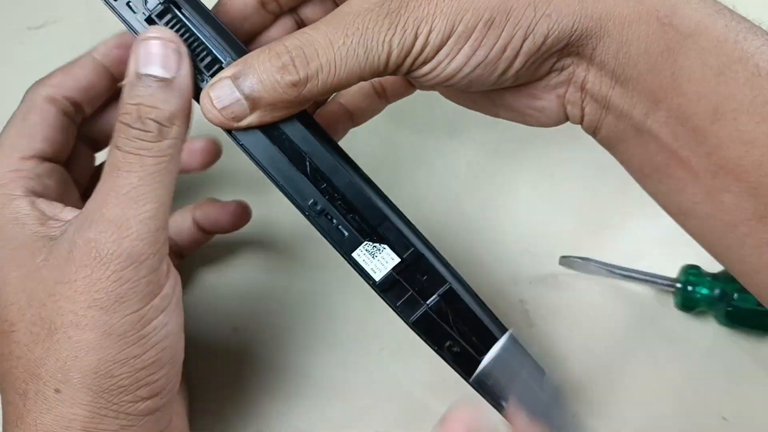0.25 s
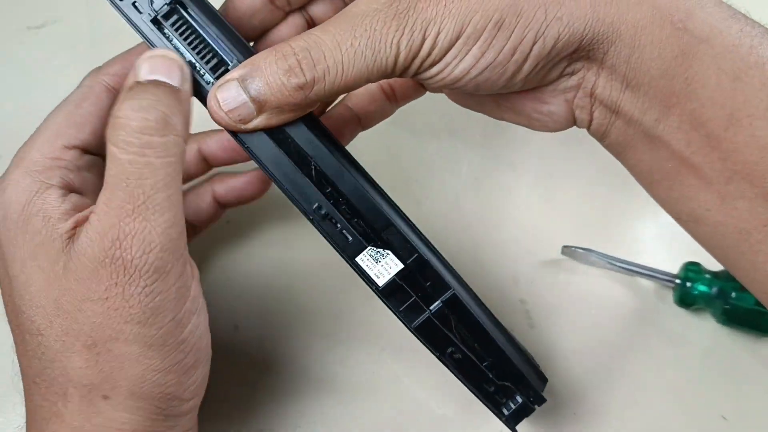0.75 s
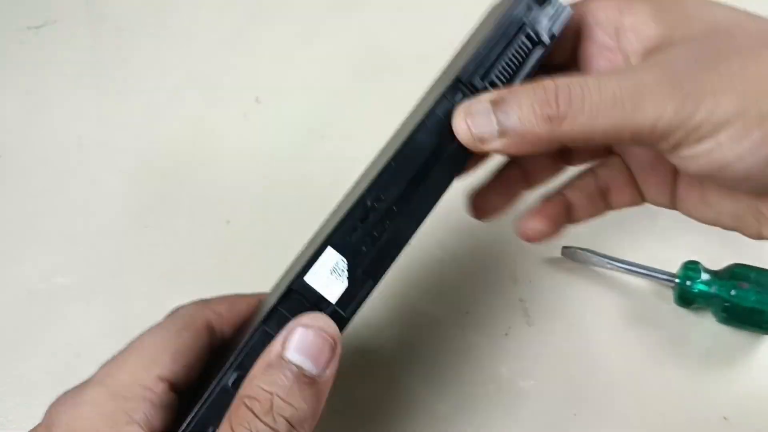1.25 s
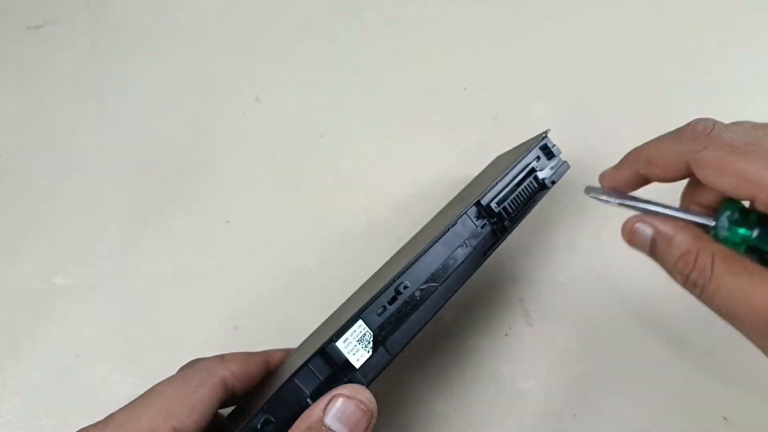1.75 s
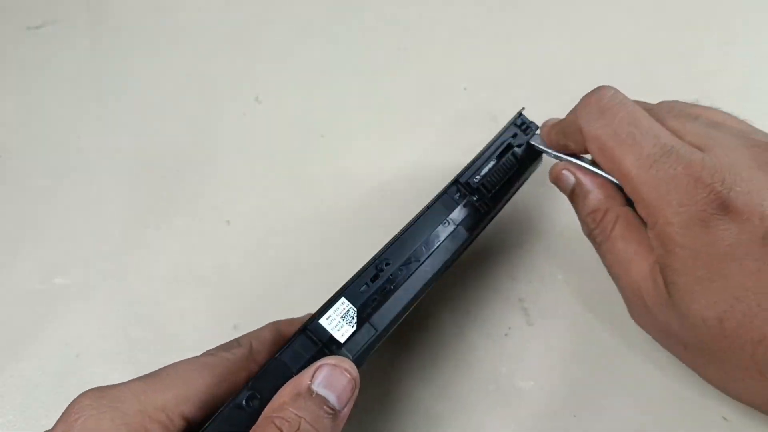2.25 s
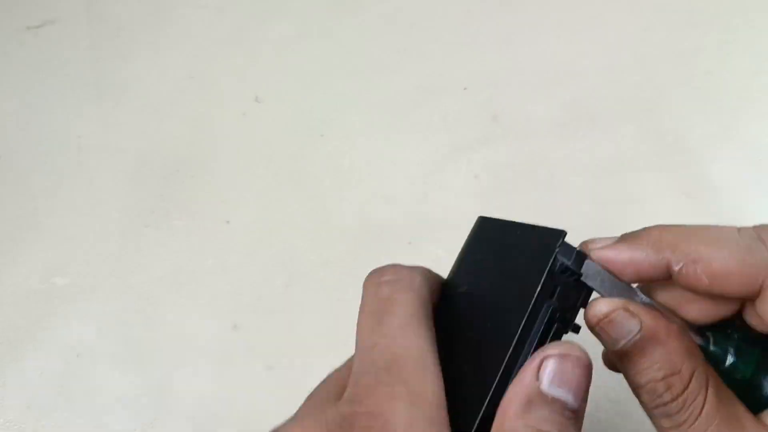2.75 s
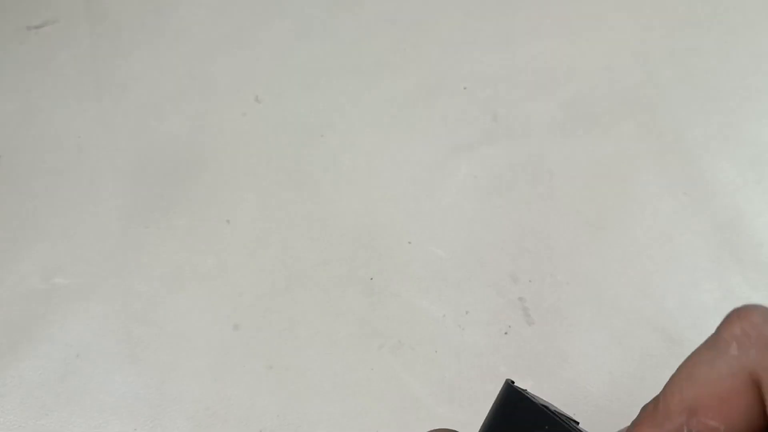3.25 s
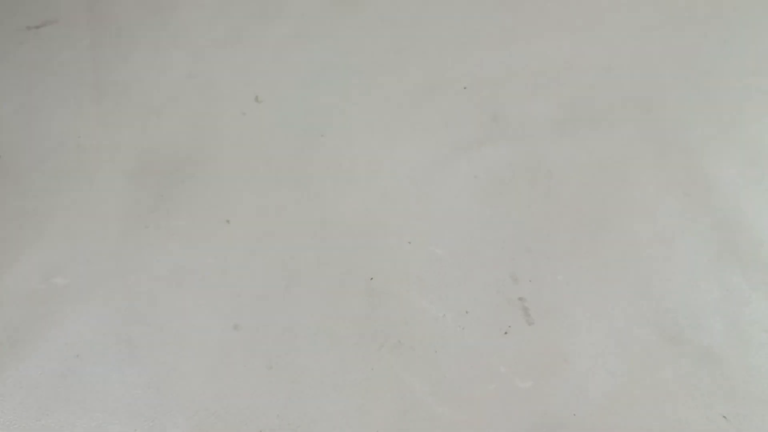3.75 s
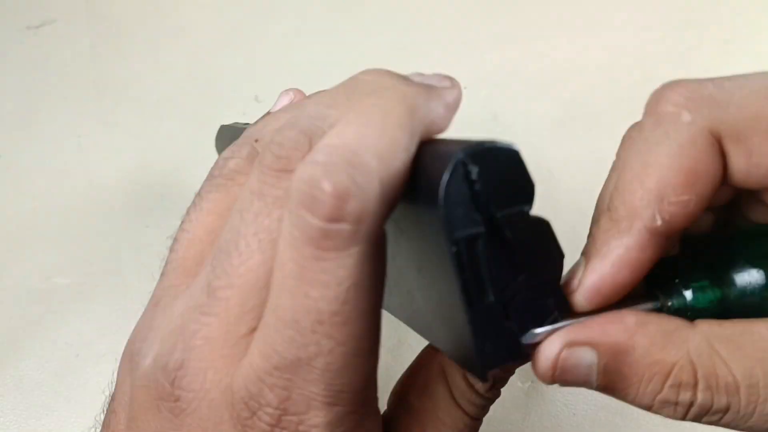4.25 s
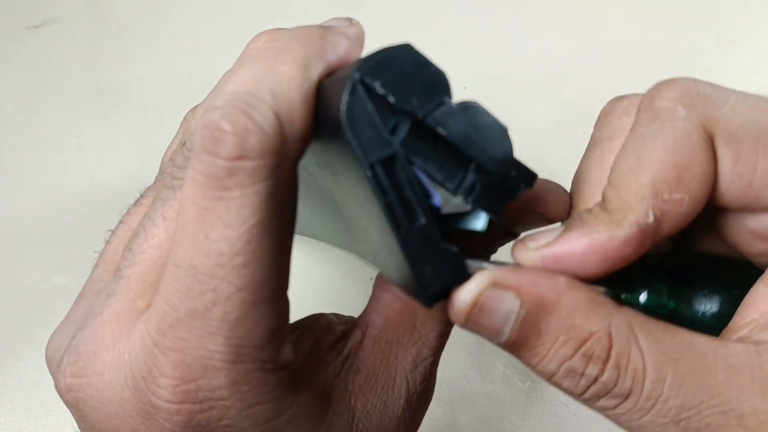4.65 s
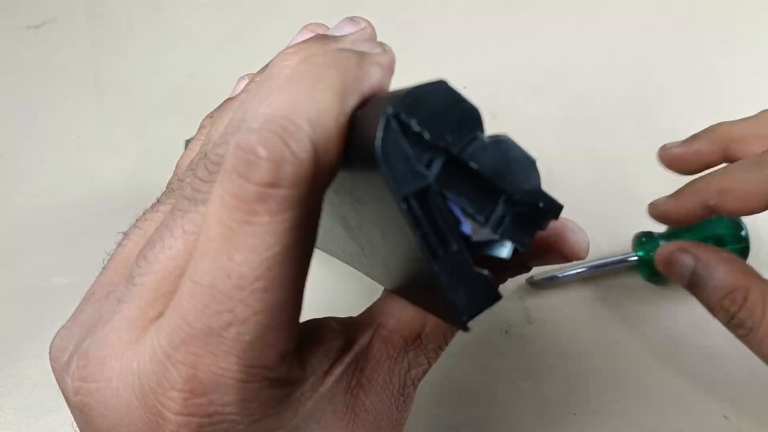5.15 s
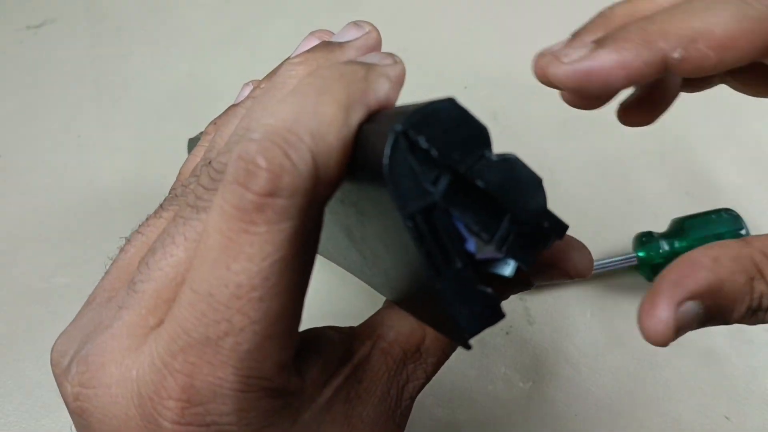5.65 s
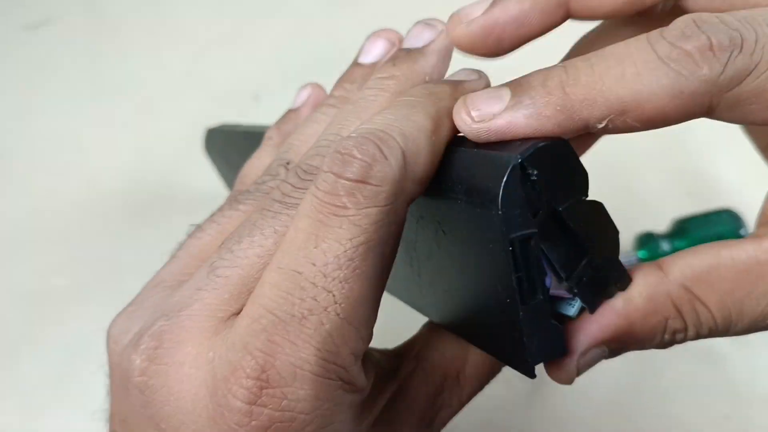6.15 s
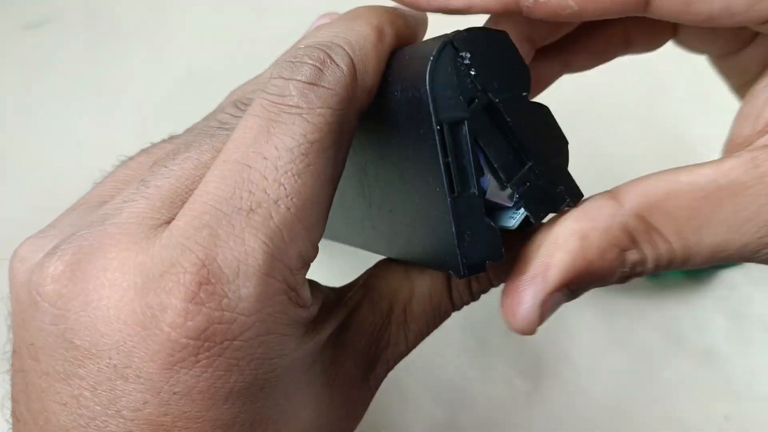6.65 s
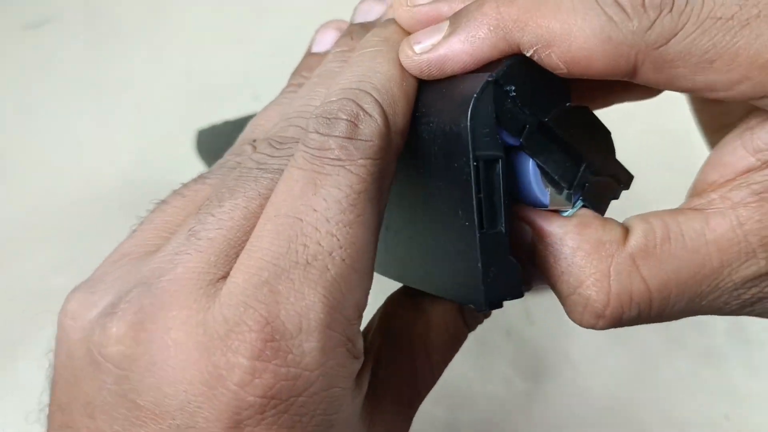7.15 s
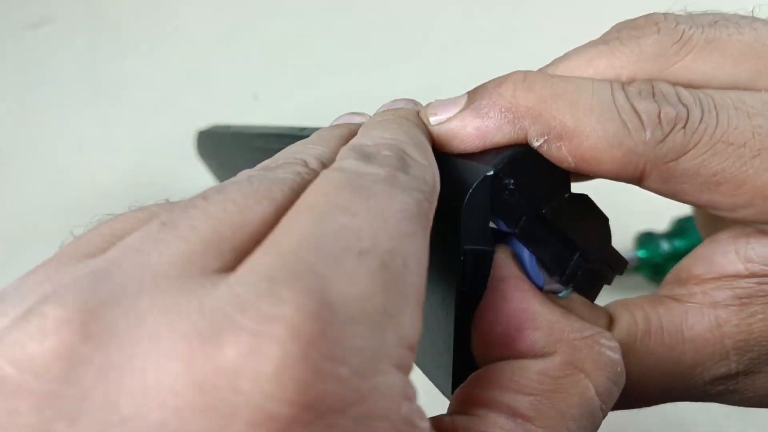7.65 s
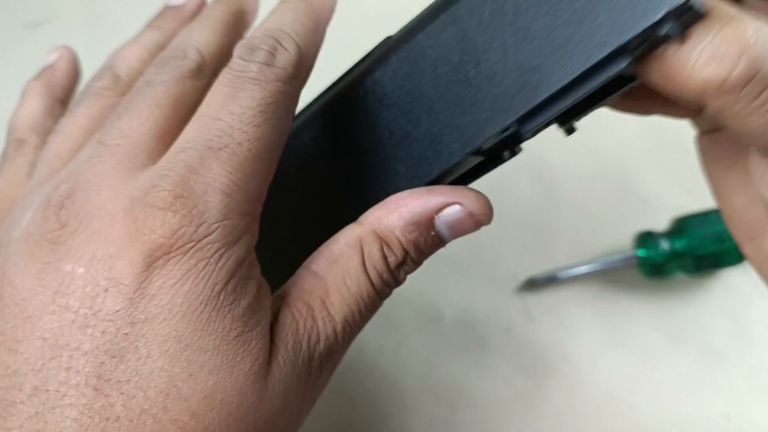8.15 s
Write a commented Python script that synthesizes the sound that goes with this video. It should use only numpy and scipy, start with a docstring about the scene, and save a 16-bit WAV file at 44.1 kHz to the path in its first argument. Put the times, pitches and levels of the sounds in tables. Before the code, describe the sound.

A hollow plastic case is pried open close up: a bump, metal clicks along a seam, then sharp snaps and crunchy cracks over soft rubbing.

```python
"""Soft bumps on a table, then metal clicks, over skin rubbing on plastic and a faint room murmur.
A hollow plastic battery case is pried open by hand, close to the microphone, in a small room.
A blade clicks and skids along the seam as filtered pulses and stick-slip runs; squeaks are damped sines.
The shell scuffs, knocks, then snaps and grinds as its clips let go, exciting shell modes and a short room tail.
The laid-down screwdriver rocks as damped modes; rub, hiss and murmur are coloured noise."""
import sys
import numpy as np
from scipy import signal
from scipy.fft import rfft, irfft, next_fast_len
from scipy.io import wavfile
from scipy.ndimage import map_coordinates

SR = 44100
rng = np.random.default_rng(int(sys.argv[2]) if len(sys.argv) > 2 else 0)


def dump_mix(stems):
    """Bounce the given channels to the path in sys.argv[1] as a 16-bit WAV at rate SR."""
    frames = np.atleast_2d(stems).T  # one column per channel
    limited = np.clip(frames, -1, 1)  # hard clip at full scale
    pcm = np.round(limited * 32767).astype(np.int16)
    wavfile.write(sys.argv[1], SR, pcm)


N = 370881  # samples in the scene

# low murmur of the room, before trim: (time [s], level [dB])
MURMUR_LEVEL = [(0.0, -55), (0.75, -58.5), (1.57, -56.5), (6.14, -59), (6.37, -56.5), (8.41, -57)]
# murmur spectrum: (frequency [Hz], density [dB per Hz])
MURMUR_SPECTRUM = [(15, -41.5), (25, 1.5), (49, -38.5), (94, -3.5), (185, 2.5), (256, -0.5), (427, -10.5),
                   (575, -11), (840, -10), (1440, -34.5), (1700, -28.5), (2480, -36.5), (10100, -38.5),
                   (14800, -48), (16000, -33)]
# room decay: (frequency [Hz], t60 [s])
ROOM_DECAY = [(150, 0.29), (700, 0.17), (2500, 0.19), (7000, 0.15), (15000, 0.025)]
# hands on the plastic, before trims and sway: (time [s], hollow rub level [dB], skin hiss level [dB])
HAND_LEVELS = [(0.0, -55.5, -66.5), (0.89, -55.5, -66), (1.26, -51, -60.5), (1.85, -59, -72.5),
               (2.67, -51.5, -63), (2.97, -54.5, -65.5), (3.32, -51, -68), (3.93, -59.5, -67),
               (4.56, -56.5, -66), (4.8, -50, -64), (5.22, -68.5, -71), (6.21, -59.5, -71),
               (6.53, -56, -66), (6.84, -65, -69.5), (7.21, -58, -66), (7.35, -55, -68), (8.01, -61, -68.5),
               (8.41, -70, -70.5)]
# hollow rub spectrum: (frequency [Hz], level [dB])
RUB_SPECTRUM = [(150, -42), (350, -1), (600, 5.5), (950, 2), (1400, -27), (2500, -21.5), (5000, -57)]
# skin hiss spectrum: (frequency [Hz], density [dB per Hz])
SKIN_SPECTRUM = [(710, -14.5), (1200, 2.5), (3050, -8), (3870, -11.5), (5180, -11), (9720, -20.5),
                 (15200, -31), (16000, -47.5)]
# bumps on the table: (time [s], level [dB])
TABLE_BUMPS = [(.016, -47), (0.075, -47), (0.199, -40.5), (1.473, -22.5), (1.505, -29), (2.706, -29.5),
               (2.721, -28.5), (4.21, -25), (4.771, -36), (5.081, -44), (5.69, -45.5), (6.241, -39.5),
               (6.654, -41.5), (7.334, -37), (7.931, -39)]
# table modes: (frequency [Hz], mean level [dB], t60 [s])
TABLE_MODES = [(120, -12.5, 0.24), (174, 2, .14), (205, 2, 0.023), (257.3, -1.5, 0.15), (331, -19.5, 0.11)]
# metal tip clicking in the seam: (time [s], level [dB], bass [dB], presence [dB], treble [dB])
SEAM_CLICKS = [(.0944, -44.5, 4, 6, 7), (0.1677, -36, -14, -5, -6), (0.1983, -30.5, -18, -8, -15),
               (2.11, -33.5, 10.5, -4, -8.5), (2.2252, -36, -7, -8, -6), (2.301, -32, -14, -3.5, -0.5),
               (2.3768, -39, 16.5, -4, 0), (2.3983, -38.5, -6, 0, -4), (2.916, -56, 15, 20, 25),
               (2.966, -47.5, 4, 17, 23), (3.1462, -30.5, 10.5, -3, -0.5), (3.2176, -44, 9, 7, 2),
               (3.262, -18.5, 10.5, 6, 1), (3.3402, -18, 0.5, 5, 1)]
# metal tip skidding along the seam: (peak time [s], fall [s], level [dB], brightness [dB])
SEAM_SKIDS = [(.195, 0.039, -39, -2), (1.85, 0.11, -61.5, -43), (2.225, 0.027, -40, -4.5),
              (2.4, 0.04, -42.5, -0.5), (2.566, 0.064, -43.5, 3.5), (2.663, 0.029, -46.5, 13),
              (2.706, 0.037, -29.5, -3.5), (2.841, .02, -47.5, 3), (2.988, 0.037, -48, -26),
              (3.05, 0.026, -48.5, 4.5), (3.144, .018, -49, 6), (3.261, 0.045, -32.5, 3),
              (3.341, .044, -36, -2), (3.484, 0.048, -49, 11), (3.587, 0.034, -43.5, -2),
              (3.729, 0.048, -53, 15), (4.52, .09, -62.5, 5)]
# base colour of a blade contact: (frequency [Hz], level [dB])
BLADE_SPECTRUM = [(50, -52), (120, -20), (300, -13.5), (520, -5), (640, -4.5), (830, 3.5), (1250, -2),
                  (1700, -4), (2200, -12.5), (3800, -15.5), (6000, -19), (10000, -25.5), (15500, -45)]
# steel squeaking or ringing as it slips: (time [s], frequency [Hz], level [dB], t60 [s])
STEEL_PINGS = [(.198, 5782, -69, .45), (.255, 3402, -63, .35), (2.701, 1130, -24, .09),
               (3.144, 5340, -46, .04), (3.474, 5600, -48, .06)]
# shell scuffing in the grip: (peak time [s], fall [s], level [dB], brightness [dB])
SCUFFS = [(1.036, 0.054, -55, -9), (1.103, 0.018, -52, -1), (1.2, 0.046, -49, -27),
          (1.465, .026, -35, -1.5), (1.546, 0.04, -54, 9.5), (4.145, .044, -48.5, 1), (3.877, .012, -46, 7),
          (3.952, 0.011, -49, 5), (4.609, 0.019, -39, 2), (5.135, 0.032, -57.5, 13),
          (5.699, 0.031, -34.5, -10), (6.091, .04, -46, -18), (6.375, .02, -41, 1), (6.528, 0.04, -45, -9),
          (6.565, 0.03, -39, 0.5), (6.897, 0.046, -49, -0.5), (7.001, 0.059, -44, 5)]
# case knocked, or loose halves knocking together; the row at 5.031 s is the screwdriver laid down on the table:
# (time [s], level [dB], bass [dB], brightness [dB], resonance [Hz])
KNOCKS = [(1.4711, -22.5, -6.5, -8, 820), (3.661, -43, 9, -0.5, 724), (3.9145, -52, -18, -2, 1630),
          (3.985, -49.5, -10, -1, 900), (4.2071, -30, 1.5, -4.5, 360), (4.559, -47.5, -15, 0.5, 580),
          (4.86, -34, -7, -1.5, 720), (4.983, -50.5, 0, 8, 1650), (5.031, -28.5, 0.5, -17.5, 520),
          (5.076, -46, -12, 5, 603), (6.3789, -25, 1.5, -7.5, 835), (6.609, -32, 6, -7, 650),
          (6.5734, -38.5, -6, -1.5, 760), (6.6444, -49, 10, 8, 540), (7.468, -54.5, 23, 17, 800),
          (7.133, -42.5, 14, 8, 1120), (7.1745, -36, -10, -1.5, 554), (7.3735, -38.5, -1, -12, 378),
          (7.498, -36.5, -2.5, -6, 390), (7.65, -36.5, -8, -6, 796), (8.1745, -41.5, -5, 2, 1660),
          (8.2444, -44.5, -5, -5.5, 725), (8.3602, -45.5, -2, -5, 1020)]
# a clip creeps, snaps free and grinds on: (time [s], snap level [dB], grind level [dB], rise [s], fall [s],
# bass [dB], presence [dB], treble [dB], resonance [Hz])
CLIP_SNAPS = [(4.6235, -31.5, -39.5, .012, 0.015, -5.5, 1.5, 1.5, 815),
              (4.7499, -22, -25, .015, 0.056, -5, 9, 11, 2310),
              (4.7688, -20, -24, 0.028, 0.052, -8, 5, 1.5, 2170),
              (4.927, -43, -38, 0.016, 0.016, -16, 3, -2, 1600),
              (6.241, -45.5, -51.5, .015, 0.065, 4, 1.5, 3, 760),
              (6.4055, -25.5, -31.5, 0.015, 0.041, 7, 6.5, 13, 870),
              (6.426, -29.5, -42, .008, 0.032, 9, 10, 3, 620),
              (6.692, -33, -38, .027, 0.056, 2.5, -2.5, -5, 606),
              (7.0264, -34, -26.5, .011, 0.05, 3, 5, 2.5, 850),
              (7.0451, -20, -34.5, .029, 0.077, -11, -0.5, -1, 840),
              (7.1887, -32.5, -43, 0.01, 0.012, -3, 3, 5, 396),
              (7.2833, -41, -45.5, .035, 0.046, 4.5, -1.5, -1.5, 1770),
              (7.5996, -38.5, -45, 0.013, 0.026, -6, -3, 4, 1870),
              (7.7205, -67, -44.5, .012, 0.035, -0.5, 4, -0.5, 730),
              (7.894, -24, -30, .014, 0.041, -10, 6, 18, 824),
              (7.8978, -23, -28.5, .024, 0.074, -6.5, 4.5, 6, 880),
              (8.0171, -16.5, -36, .037, 0.037, -6.5, 0, -3.5, 610),
              (8.2083, -46.5, -55.5, 0.029, 0.052, 4, 4, -4, 980)]
# base colour of a shell contact: (frequency [Hz], level [dB])
SHELL_SPECTRUM = [(50, -52.5), (110, -23), (200, -7), (400, -5.5), (600, 1), (850, -3.5), (1400, -7),
                  (2000, -6.5), (2900, -16), (3700, -15.5), (7000, -18.5), (10500, -23.5), (15500, -40)]
# hollow shell modes: (frequency [Hz], mean level [dB], t60 [s])
SHELL_RINGING = [(388, 21.5, 0.058), (599.2, 9.5, 0.13), (738, -0.5, 0.24), (830, 5, 0.087),
                 (1033, 24, 0.019), (1686, 18, 0.09), (1945, 11, 0.12), (2086, 4, 0.043), (2170, -4, .13),
                 (2376, -48.5, .12), (2425, -18, 0.065), (2843, 26, 0.017)]
# screwdriver, laid down, rocking on its handle: (time [s], level [dB])
HANDLE_ROCKS = [(5.328, -31.5), (5.531, -36)]
# handle modes on the table: (frequency [Hz], mean level [dB], t60 [s])
HANDLE_MODES = [(398, 1, 0.066), (563, 6.5, 0.026), (830, -7.5, 0.069), (1100, -15, 0.066)]

# axes of one short sound
SIZE = 8192
HZ = np.fft.rfftfreq(SIZE, 1 / SR)
T = np.arange(SIZE) / SR

MURMUR_TRIM_DB, RUB_TRIM_DB, HISS_TRIM_DB = 2.0, -6.5, 1.5
PULSE_DELAY_S = .001
BLADE_HZ = 1110  # strongest resonance of the seam under the tip, top of its range in skids
SKID_RISE_SHARE, SKID_BASS_DB = .42, 2.5  # rise over fall; weight
SCUFF_RISE_SHARE, SCUFF_BASS_DB, SCUFF_HZ = .48, 0.5, 706  # rise over fall; weight; strongest resonance
PRESENCE_SHARE = 0.88  # presence dB per dB of brightness
CREEP_S = .011  # grind is 13 dB below its peak this long before the snap
TOP_HZ = 15980  # band limit


def amp(db):
    """Decibels to gain."""
    return 10 ** (np.asarray(db) / 20)


def unit(x):
    """x at rms 1."""
    return x / np.sqrt(np.mean(x ** 2) + 1e-20)


def along(points, hz):
    """(Hz, value) points interpolated on a log frequency axis."""
    f, v = np.transpose(points)
    return np.interp(np.log(hz + 1), np.log(f + 1), v)


def curves(rows):
    """One value per sample for each column after the time."""
    s, *cols = np.transpose(rows)
    return [np.interp(np.arange(N) / SR, s, c) for c in cols]


def wobble(rate_hz):
    """Smooth random curve through rate_hz knots a second."""
    knots = rng.standard_normal(int(N * rate_hz / SR) + 4)
    return map_coordinates(knots, [np.arange(N) * rate_hz / SR])


def filtered(x, gain):
    """x times a frequency-dependent gain, zero phase."""
    m = next_fast_len(N + SIZE)
    return irfft(rfft(x, m) * gain(np.fft.rfftfreq(m, 1 / SR)), m)[:N]


def coloured(x, spectrum):
    """x shaped by the spectrum, at rms 1."""
    return unit(filtered(x, lambda hz: amp(along(spectrum, hz))))


def add(track, s, sound):
    """Mix a sound into the track from time s."""
    i = max(round(s * SR), 0)
    track[i:i + len(sound)] += sound[:max(len(track) - i, 0)]


def with_response(x, tail, tail_db):
    """x plus its convolution with a tail normalised to tail_db of energy."""
    response = amp(tail_db) * tail / np.linalg.norm(tail)
    response[0] += 1
    return signal.fftconvolve(x, response)


def in_room(x, wet_db):
    """x plus a short room tail: noise decaying per band, redrawn each call."""
    hz, t, z = signal.stft(rng.standard_normal(2 * SIZE), SR, nperseg=256)
    decay = amp(-60 * t / along(ROOM_DECAY, hz)[:, None])
    tail = signal.istft(z * decay, SR, nperseg=256)[1]
    onset = 1 - np.exp(-(np.arange(len(tail)) / SR / 0.00067) ** 2)
    return with_response(x, tail * onset, wet_db)


def ring(modes):
    """Sum of damped modes, struck at new strengths each time."""
    hz, db, t60 = np.transpose(modes)[:, :, None]
    db = db + 2.5 * rng.standard_normal(hz.shape)
    return np.sum(amp(db - 60 * T / t60) * np.cos(2 * np.pi * hz * T), axis=0)


def stick_slip(count, rate_hz, spread_db, grit):
    """Slips at uneven intervals and of uneven size over fine grit, rms 1."""
    sizes = amp(spread_db * np.clip(rng.standard_normal(count), -2, 2))
    slips = (rng.random(count) < rate_hz / SR) * sizes
    return unit(unit(slips) + grit * rng.standard_normal(count))


def shade(bass_db, bright_db, peak_hz):
    """Colour of a light contact, presence following brightness: (bass, presence, treble, resonance)."""
    return bass_db, PRESENCE_SHARE * bright_db, bright_db, peak_hz


def contact(tone, colour, peak_db):
    """Pulse of one contact: minimum phase plus blur, coloured by shelves, one resonance and random ripple."""
    bass_db, presence_db, treble_db, peak_hz = colour
    shelves = [(430, bass_db), (750, 0.0095), (1350, 0.0039), (1900, presence_db), (3100, presence_db),
               (4300, treble_db), (13000, 1.36 * treble_db - 5)]
    resonance_db = peak_db / (1 + ((HZ - peak_hz) / 110) ** 2)
    ripple_db = 1.7 * map_coordinates(rng.standard_normal(128), [np.sqrt(HZ) * .5])
    ripple_db = ripple_db * np.minimum(HZ / 2000, 1)
    db = along(tone, HZ) + along(shelves, HZ) + resonance_db + ripple_db
    # fold the cepstrum for minimum phase
    cepstrum = irfft(np.log(amp(db)))
    cepstrum[1:SIZE // 2] *= 2
    cepstrum[SIZE // 2 + 1:] = 0
    # short waves take many paths through the ribs, which blurs the crack
    paths_rad = 1.4 * map_coordinates(rng.standard_normal(64), [HZ / 900]) * np.minimum(HZ / 3000, 1)
    phase_rad = paths_rad - 2 * np.pi * HZ * PULSE_DELAY_S
    return irfft(np.exp(rfft(cepstrum) + 1j * phase_rad))[:SIZE // 2]


def click(pulse, lead_s, chatter_db, chatter_s):
    """Edge creeps for about lead_s, lets go and chatters; energy of 5 ms at rms 1."""
    t = T - lead_s
    chatter = rng.standard_normal(SIZE) * np.exp(np.where(t < 0, 4 * t / lead_s, -t / chatter_s))
    force = amp(chatter_db) * chatter / np.linalg.norm(chatter)
    force[round(lead_s * SR)] += 1
    sound = signal.fftconvolve(force, pulse)[:SIZE]
    return sound / np.linalg.norm(sound) * np.sqrt(.005 * SR)


def stroke(pulse, rise_s, fall_s, rate_hz, spread_db, grit):
    """Run of slips that swells for twice rise_s, then dies away."""
    t = np.arange(2 * SIZE) / SR - 2 * rise_s
    swell = amp(np.where(t < 0, -13 * np.abs(t / rise_s) ** 1.88, -17 * t / fall_s))
    sound = signal.fftconvolve(swell * stick_slip(len(t), rate_hz, spread_db, grit), pulse)
    return sound * np.linalg.norm(swell) / np.linalg.norm(sound)


def room_murmur():
    """Low murmur of the room: coloured noise on a slow level curve."""
    level_db, = curves(MURMUR_LEVEL)
    return amp(level_db + MURMUR_TRIM_DB) * coloured(rng.standard_normal(N), MURMUR_SPECTRUM)


def hands():
    """Skin drags over plastic: stick-slip as hollow rub and grainy hiss, both swaying with the grip."""
    rub_db, hiss_db = curves(HAND_LEVELS)
    grip = wobble(12)
    rub = coloured(stick_slip(N, rate_hz=650, spread_db=20.0, grit=0.82), RUB_SPECTRUM)
    hiss = coloured(stick_slip(N, rate_hz=400, spread_db=5, grit=2), SKIN_SPECTRUM)
    rub = amp(rub_db + RUB_TRIM_DB + 1.5 * grip) * rub
    hiss = amp(hiss_db + HISS_TRIM_DB + 1.6 * grip) * hiss
    return rub + hiss


def table():
    """Soft bumps set the damped modes of the table top booming."""
    out = np.zeros(N)
    for s, db in TABLE_BUMPS:
        boom = ring(TABLE_MODES) * (1 - np.exp(-T / 0.0024))  # soft onset
        add(out, s, amp(db) * in_room(boom, wet_db=-26.5))
    return filtered(out, lambda hz: 1 / (1 + (75 / (hz + 1)) ** 4))  # the panel radiates no deep bass


def blade():
    """Metal tip clicks against the seam's edges and skids along it by stick-slip."""
    out, lead_s = np.zeros(N), .0035
    for s, db, *shelves in SEAM_CLICKS:
        pulse = contact(BLADE_SPECTRUM, (*shelves, BLADE_HZ), peak_db=8)
        tick = click(pulse, lead_s, chatter_db=-7, chatter_s=.0035)
        add(out, s - lead_s - PULSE_DELAY_S, amp(db) * in_room(tick, wet_db=-13.5))
    for s, fall_s, db, bright_db in SEAM_SKIDS:
        rise_s = SKID_RISE_SHARE * fall_s
        colour = shade(SKID_BASS_DB, bright_db, BLADE_HZ * rng.uniform(0.86, 1.0))
        pulse = contact(BLADE_SPECTRUM, colour, peak_db=6.5)
        skid = stroke(pulse, rise_s, fall_s, rate_hz=1600, spread_db=3.5, grit=0.83)
        add(out, s - 2 * rise_s, amp(db) * in_room(skid, wet_db=-30))
    return out


def steel():
    """Thin ringing of the tool: damped sines with a soft onset."""
    out, t = np.zeros(N), np.arange(SR // 2) / SR
    for s, hz, db, t60 in STEEL_PINGS:
        onset = 1 - np.exp(-t / 0.00084)
        add(out, s, amp(db - 60 * t / t60) * np.sin(2 * np.pi * hz * t) * onset)
    return out


def in_shell(x, ring_db):
    """x plus the ringing it starts in the hollow shell."""
    return with_response(x, ring(SHELL_RINGING), ring_db)


def grind(colour, rise_s, fall_s):
    """Plastic judders over plastic: a crunchy run of tiny snaps."""
    pulse = contact(SHELL_SPECTRUM, colour, peak_db=8.0)
    creak = stroke(pulse, rise_s, fall_s, rate_hz=1200, spread_db=3.5, grit=.55)
    return in_room(in_shell(creak, ring_db=-11), wet_db=-21)


def snap(colour, lead_s):
    """One sharp contact of the shell, ringing in its hollow and in the room."""
    pulse = contact(SHELL_SPECTRUM, colour, peak_db=7.5)
    crack = click(pulse, lead_s, chatter_db=-3, chatter_s=.0035)
    return in_room(in_shell(crack, ring_db=-20.5), wet_db=-10.5)


def shell():
    """Shell scuffs by stick-slip, knocks by single contacts; clips let go with a snap and a grind."""
    out, lead_s = np.zeros(N), .004
    for s, fall_s, db, bright_db in SCUFFS:
        rise_s = SCUFF_RISE_SHARE * fall_s
        colour = shade(SCUFF_BASS_DB, bright_db, SCUFF_HZ)
        add(out, s - 2 * rise_s, amp(db) * grind(colour, rise_s, fall_s))
    for s, db, *colour in KNOCKS:
        add(out, s - lead_s - PULSE_DELAY_S, amp(db) * snap(shade(*colour), lead_s))
    for s, snap_db, grind_db, rise_s, fall_s, *colour in CLIP_SNAPS:
        add(out, s - lead_s - PULSE_DELAY_S, amp(snap_db) * snap(colour, lead_s))
        add(out, s - CREEP_S - rise_s, amp(grind_db) * grind(colour, rise_s, fall_s))
    return out


def screwdriver():
    """Handle tips from one flat to the next: damped modes in a dull, hollow knock."""
    out = np.zeros(N)
    for s, db in HANDLE_ROCKS:
        knock = ring(HANDLE_MODES) * (1 - np.exp(-T / 0.0031))  # soft onset
        add(out, s, amp(db) * in_room(knock, wet_db=-14))
    return out


def scene():
    """Everything at one microphone."""
    return (room_murmur() + hands() + table() + blade() + steel() + shell() + screwdriver())[None]


def record(dry):
    """Second-order roll-off below 60 Hz and a sharp cut at TOP_HZ, both zero phase."""
    return filtered(dry[0], lambda hz: (hz < TOP_HZ) * hz ** 2 / np.sqrt(hz ** 4 + 60 ** 4))[None]


dry = scene()
out = record(dry)
dump_mix(out)
```